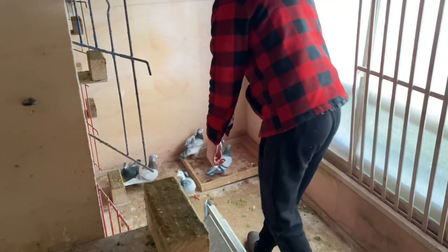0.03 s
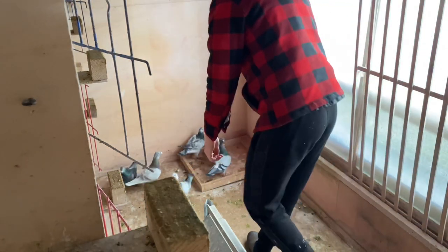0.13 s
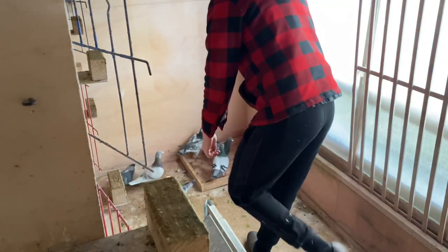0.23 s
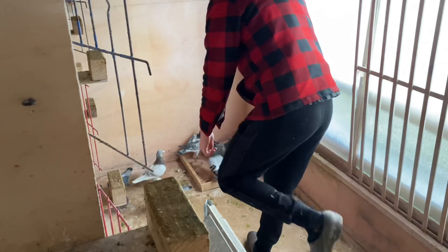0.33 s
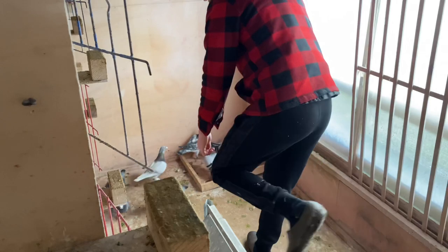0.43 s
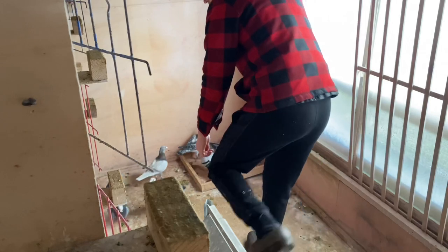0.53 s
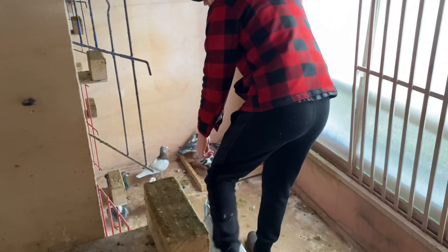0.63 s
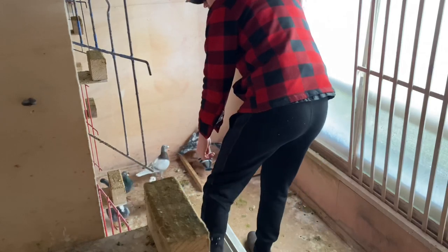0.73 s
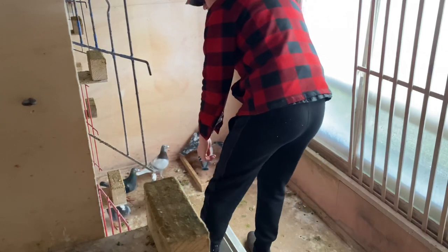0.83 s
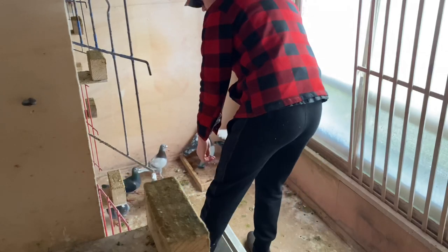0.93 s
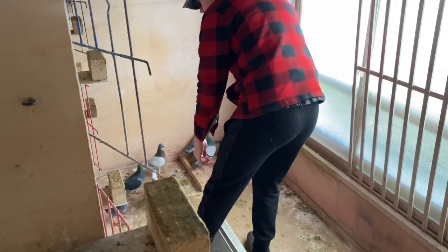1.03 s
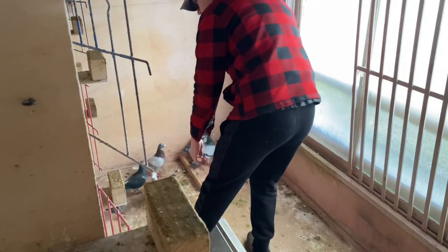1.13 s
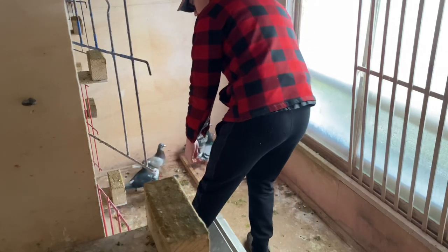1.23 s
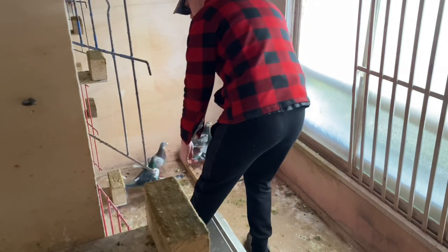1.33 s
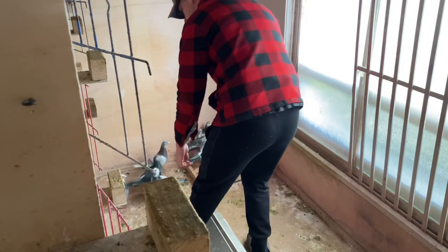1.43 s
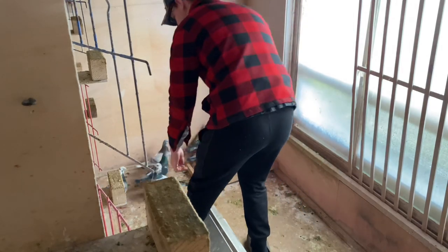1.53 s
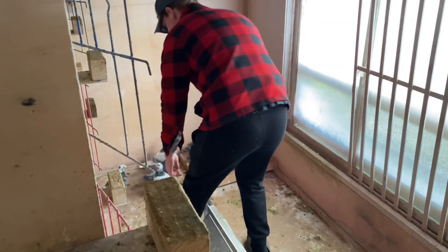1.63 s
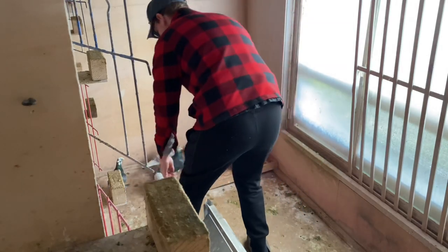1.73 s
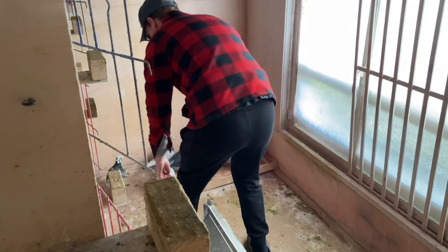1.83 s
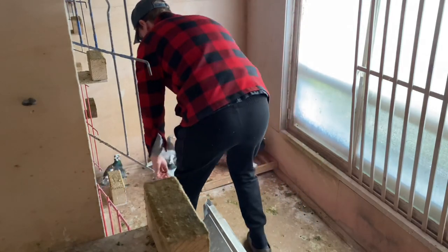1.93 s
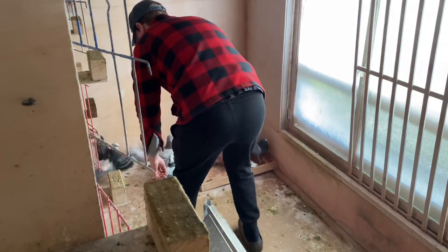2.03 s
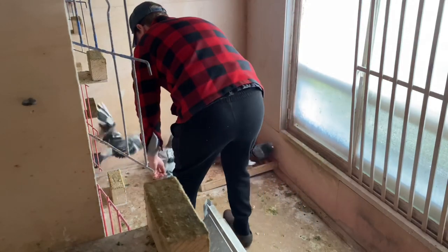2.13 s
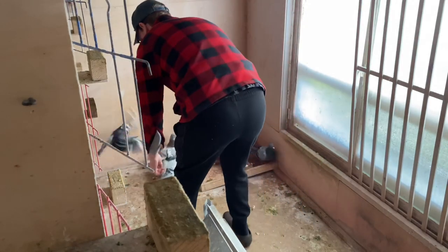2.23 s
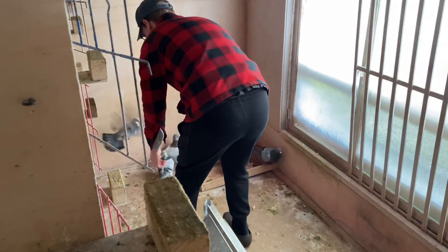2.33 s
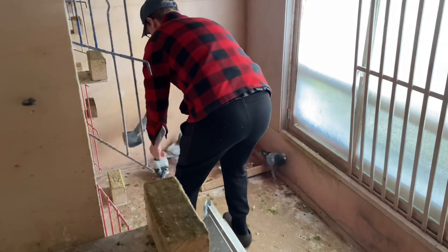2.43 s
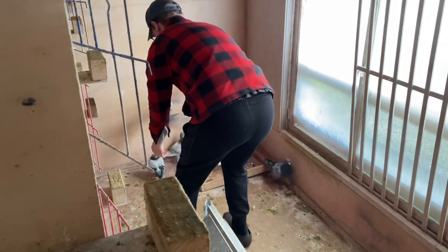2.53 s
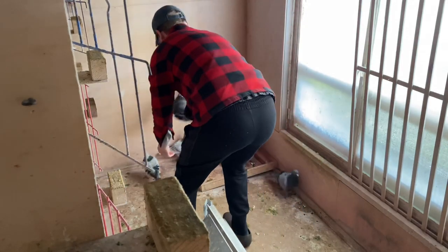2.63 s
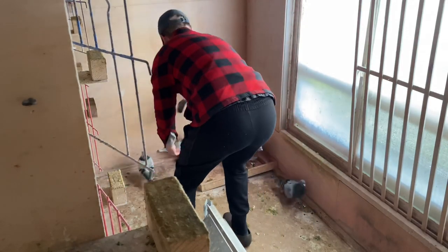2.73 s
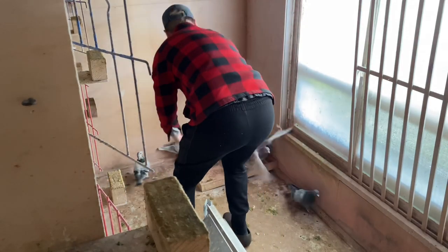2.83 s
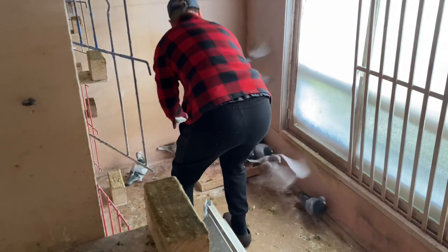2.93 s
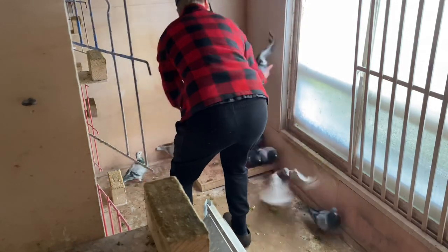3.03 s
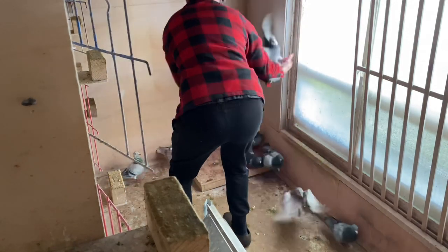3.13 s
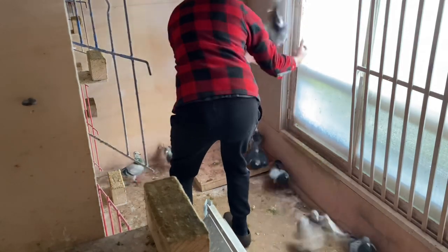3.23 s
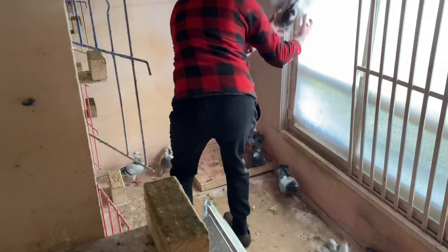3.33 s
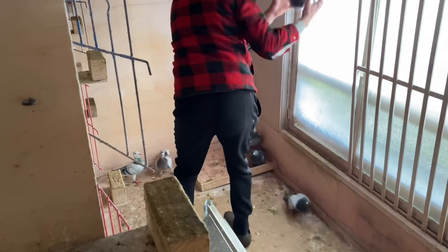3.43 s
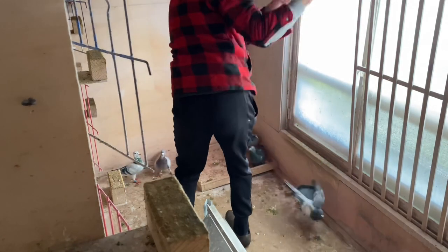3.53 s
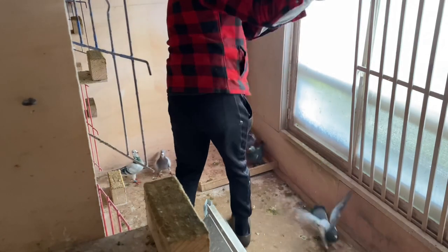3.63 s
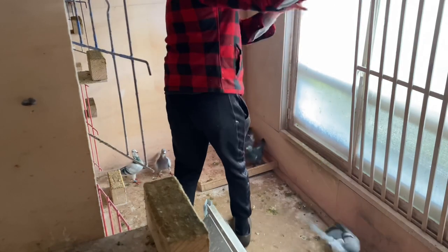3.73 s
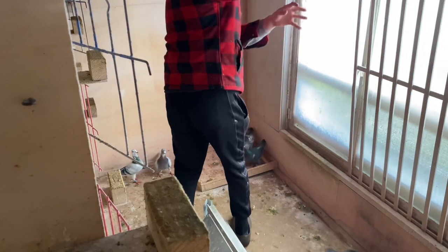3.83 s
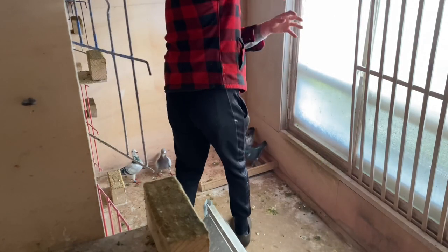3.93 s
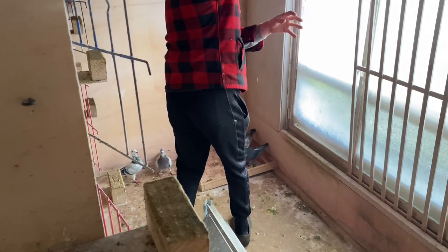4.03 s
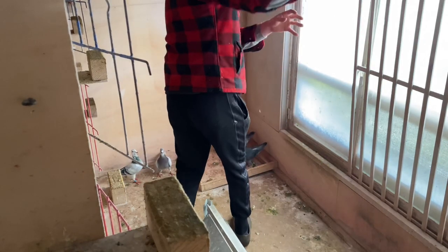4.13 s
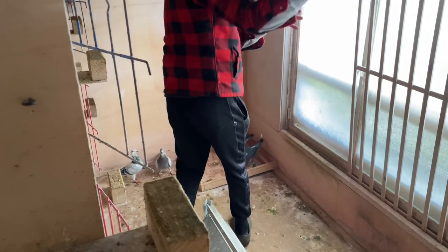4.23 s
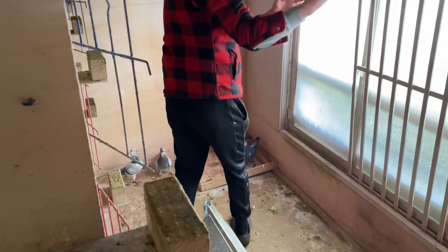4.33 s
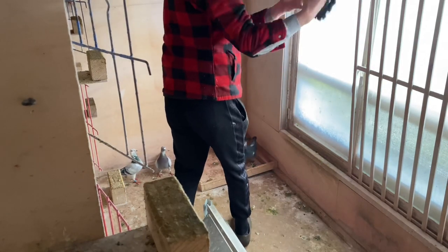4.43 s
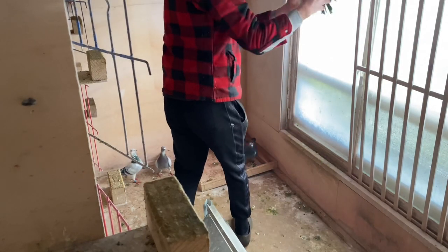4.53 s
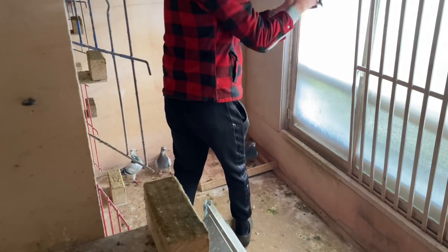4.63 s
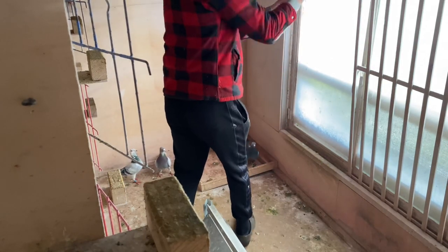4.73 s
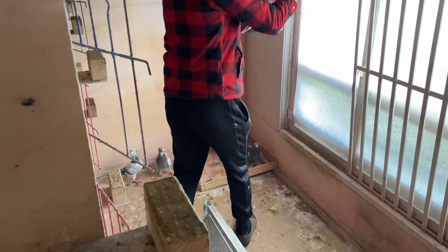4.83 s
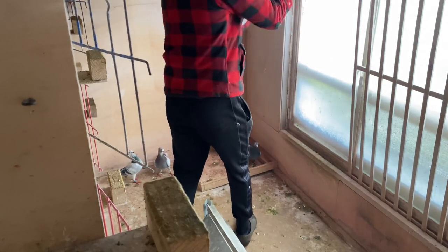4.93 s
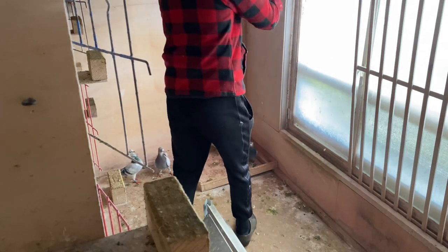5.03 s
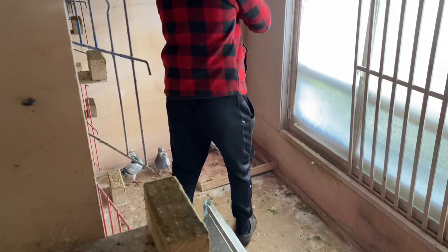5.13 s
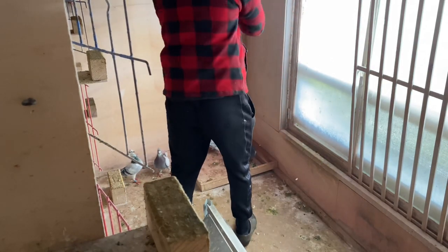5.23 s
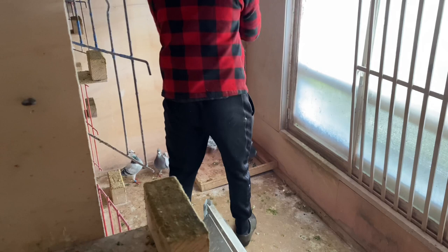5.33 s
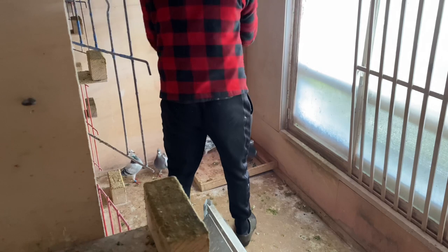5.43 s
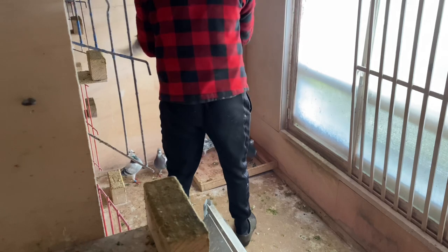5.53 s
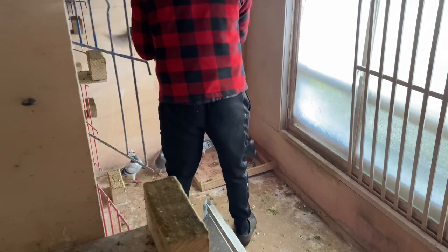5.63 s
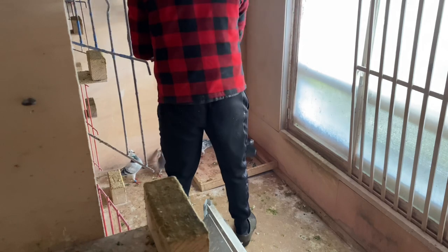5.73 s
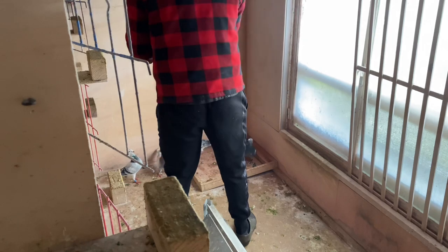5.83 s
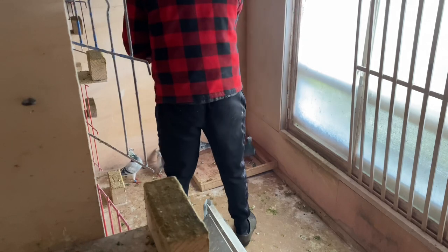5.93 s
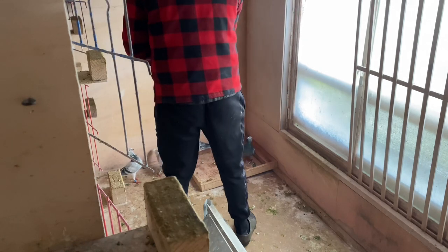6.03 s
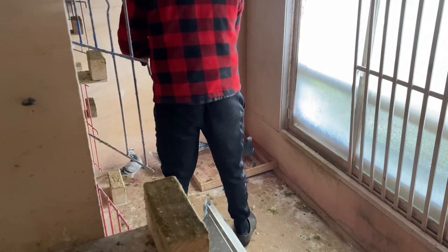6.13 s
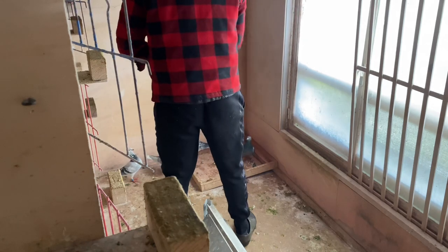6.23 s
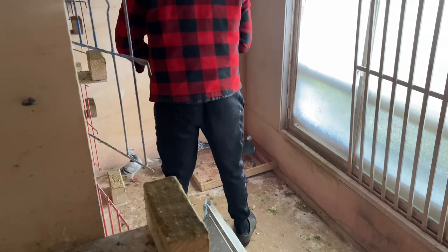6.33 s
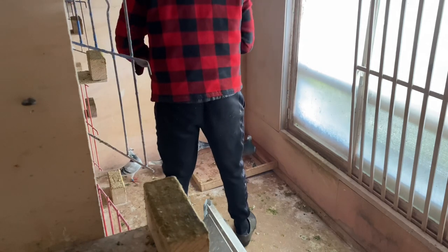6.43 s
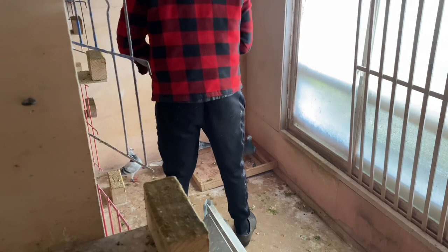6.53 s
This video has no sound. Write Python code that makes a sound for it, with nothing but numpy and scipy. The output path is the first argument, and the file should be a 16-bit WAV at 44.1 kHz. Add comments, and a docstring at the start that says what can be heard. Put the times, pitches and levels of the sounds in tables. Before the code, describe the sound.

A close stereo pickup in a small bare loft, with short, boxy reflections and a faint low hush from outside. From 0 to 2 seconds a keeper's shoes knock, scuff and crackle on gritty boards, busiest around 0.6; at 1.0 a loose plank is struck and rings briefly over a low thud. Around 2.0 wings start, and from 2.2 to 3.7 pigeons flap furiously: quick whooshes, hollow whups, swishing feathers, rattling quills and hard claps, with a sharp tick at 2.5 and deep floor bumps near 2.95 and 3.4. From 3.7 the flurry loosens into separate flaps and claw ticks. Thin, breathy wing whistles pulse at 4.0 to 4.3. Very short, faint coos or grunts come near 4.4 to 4.5 and 5.1. A strong swish lands at 5.3, then more flutters and thumps from 5.5 to 6.2, fading to near quiet with a last shoe knock at 6.5.

```python
"""In a small bare loft, pigeons scatter while a keeper steps in among them to catch one by hand.
Each wing stroke is shaped noise: a push of air, a swish of the vane, rattling quills and a clap of the tips.
Shoes knock and scuff on boards (noise and tiny snaps through resonances), and a loose plank rings once.
Coos, hollow whups and thin wing whistles are wavering sines; filtered noise makes the low boom and a faint hush.
Random echoes, diffuse tails and standing waves make the close walls heard."""
import sys
import numpy as np
from scipy import signal
from scipy.fft import rfft, irfft, next_fast_len
from scipy.io import wavfile
from scipy.ndimage import uniform_filter1d

SR = 44100
rng = np.random.default_rng(int(sys.argv[2]) if len(sys.argv) > 2 else 0)


def write(x):
    x = np.atleast_2d(x).T
    wavfile.write(sys.argv[1], SR, np.round(np.clip(x, -1, 1) * 32767).astype(np.int16))


N = 289737  # samples, about 6.6 s


def from_db(db):
    """Decibels to gain."""
    return 10 ** (np.asarray(db) / 20)


def rms_one(x):
    """Scale to unit rms."""
    return x / np.sqrt(np.mean(x ** 2) + 1e-20)


def at_hz(points, hz):
    """Read a table on a log-frequency axis."""
    known_hz, values = np.transpose(points)
    return np.interp(np.log(np.maximum(hz, 1)), np.log(known_hz), values)


def over_time(points):
    """Draw straight lines between (start_s, level_db) points, one value a sample."""
    return np.interp(np.arange(N) / SR, *np.transpose(points))


def colour(x, spectrum):
    """Filter by a smooth spectrum; white noise keeps its power, so only the shape of the spectrum counts."""
    size = next_fast_len(N + SR // 10)
    gain = rms_one(from_db(at_hz(spectrum, np.fft.rfftfreq(size, 1 / SR))))
    return irfft(rfft(x, size) * gain, size)[..., :N]


def resonate(x, modes):
    """Parallel resonances of alternating sign, scaled so that white noise roughly keeps its power."""
    out, power = 0, 0
    for k, (hz, width_hz, db) in enumerate(modes):
        r = np.exp(-np.pi * width_hz / SR)  # a wide resonance dies sooner
        half_power = (1 - r * r) / 2
        poles = [1, -2 * r * np.cos(2 * np.pi * hz / SR), r * r]
        ringing = signal.lfilter([1, 0, -1], poles, x + 1e-18)
        out = out + (-1) ** k * from_db(db) * half_power * ringing
        power += from_db(db) ** 2 * half_power
    return out / np.sqrt(power)


def cut(x, edge_hz, kind):
    """Second-order high- or low-pass."""
    return signal.sosfilt(signal.butter(2, edge_hz, kind, fs=SR, output="sos"), x)


def bursts(times, levels_db, rise, fade):
    """Sum of envelopes that swell for `rise` seconds to their level and then die away."""
    out, age = np.zeros(N), np.arange(SR // 2) / SR
    for s, db, rise_s, fade_s in np.broadcast(times, levels_db, rise, fade):
        start = max(int(s * SR), 0)
        swell = np.sin(np.pi / 2 * np.minimum(age / rise_s, 1)) ** 2
        decay = np.exp(-np.maximum(age - rise_s, 0) / max(fade_s, 1e-3))
        out[start:start + len(age)] += from_db(db) * (swell * decay)[:N - start]
    return out


def noise():
    """White turbulence."""
    return rng.standard_normal(N)


def grains(per_s, spread_db):
    """Random tiny snaps of uneven size, rms 1."""
    sizes = from_db(spread_db * np.minimum(rng.exponential(1, N), 4))
    happens = rng.random(N) < per_s / SR
    return rms_one(happens * sizes * rng.choice([-1, 1], N))


def ring_in_turn(pair, times, pitches_hz, q):
    """From each event to the next, the sound rings at that event's own pitch."""
    spare = SR // 10  # room for the last part to ring on into the next
    out = np.zeros((2, N + spare))
    edges = np.append(np.maximum(times * SR, 0).astype(int), N)
    for start, stop, hz in zip(edges, edges[1:], pitches_hz):
        part = np.pad(pair[:, start:stop], ((0, 0), (0, spare)))
        out[:, start:start + part.shape[1]] += resonate(part, [(hz, hz / max(q, 1), 0)])
    return out[:, :N]


def reflections(pair, count):
    """Echoes off the nearest walls colour the sound; their delays are redrawn nine times a second."""
    now, strength = np.arange(N), 0.33
    place = now // (SR // 9)
    out = pair.copy()
    for channel in range(2):
        # echo delays between 1/2000 and 1/110 s
        for lags in rng.integers(SR // 2000, SR // 110, (count, place[-1] + 1)):
            out[channel] += strength * pair[channel, np.maximum(now - lags[place], 0)]
    return out / np.sqrt(1 + count * strength ** 2)


def loft(x, t60, direct_db):
    """Close bare walls turn a broadband sound into a diffuse tail (t60 in seconds), different in each channel."""
    keep = from_db(-120 / (max(t60, 0.02) * SR))
    lingering_power = signal.lfilter([1 - keep], [1, -keep], x ** 2 + 1e-18)
    tail = np.sqrt(lingering_power) * rng.standard_normal((2, N))
    # floor and body scatter the direct sound within two milliseconds
    recent_power = np.abs(uniform_filter1d(x ** 2, size=89, origin=44))
    scattered = np.sqrt(recent_power) * rng.standard_normal((2, N))
    near = from_db(direct_db) * (0.38 * x + 0.6 * scattered)
    return reflections(near + tail, count=4) / np.sqrt(1 + from_db(direct_db) ** 2)


# tone of the hush from outside: pitch_hz [Hz], level_db [dB]
OUTSIDE_TONE = [(30, -3), (100, -2.5), (220, -17.5), (600, -25.5), (2000, -37.5), (7000, -46.5),
                (11000, -51), (16000, -63)]


def outside():
    """A faint, mostly low hush from outside: steady noise, drawn separately for each channel."""
    return from_db(-44) * colour(rng.standard_normal((2, N)), OUTSIDE_TONE)


# lowest resonances of the room: pitch_hz [Hz], width_hz [Hz], level_db [dB]
ROOM_MODES = [(48.6, 16.2, -1.5), (75.8, 14.5, 2), (105.5, 18.2, -1), (175, 65, -12.5)]
# how loud the boom is over time: start_s [s], level_db [dB before the boom gain]
BOOM_CURVE = [(0.0, -48), (0.62, -49), (0.9, -77), (1.08, -31), (1.35, -55), (1.96, -42), (2.36, -29),
              (2.87, -30), (3.16, -29.5), (3.57, -27.5), (3.79, -31), (4.3, -36.5), (4.7, -35.5),
              (4.9, -46), (5.25, -40.5), (5.73, -32), (6.33, -41.5), (6.57, -46.5)]
# bumps on the floor: start_s [s], lowest_pitch_hz [Hz], lowest_level_db [dB before the blow's trim],
# upper_level_db [dB before the same trim]
THUDS = [(0.343, 62, -27, -26), (1.022, 52.8, -13.5, -23), (1.445, 59, -18, -17.5), (1.64, 59, -25, -32),
         (1.986, 54.6, -23, -28), (2.948, 56, -12.5, -13.5), (3.147, 60.3, -29, -13.5),
         (3.376, 57.5, -6.5, -21), (3.662, 55.3, -14, -21), (4.1, 72, -26, -48), (4.416, 70, -22, -27),
         (4.61, 70, -19, -25), (5.514, 56, -22, -15), (5.591, 61, -19, -25), (5.794, 54.5, -14.5, -11.5),
         (6.025, 63, -16.5, -13)]
# upper resonances of the floor: pitch_hz [Hz], width_hz [Hz], level_db [dB]
FLOOR_MODES = [(105.1, 6.9, 22), (186, 8.4, 7.2)]
FLOOR_WIDTH_HZ = 5.8  # of the lowest mode, whose pitch depends on where the floor is struck
BOOM_GAIN_DB, BLOW_TRIM_DB = 3, -19.0


def boom():
    """Wing draughts stir the lowest room modes; bumps ring the floor, each with its own low and upper ring."""
    rumble = cut(resonate(rng.standard_normal((2, N)), ROOM_MODES), 260, "low")
    draught = rms_one(rumble) * from_db(over_time(BOOM_CURVE) + BOOM_GAIN_DB)

    def push(times, levels_db):
        """A padded blow of a few milliseconds."""
        return bursts(times, np.asarray(levels_db) + BLOW_TRIM_DB, rise=0.0033, fade=0.0022)

    lowest = sum(resonate(push([s], [db]), [(hz, FLOOR_WIDTH_HZ, 0)]) for s, hz, db, _ in THUDS)
    times, *_, upper_db = np.transpose(THUDS)
    return draught + lowest - resonate(push(times, upper_db), FLOOR_MODES)


# one knock on a loose plank: start_s [s], level_db [dB]
PLANK_KNOCK = (1.012, -15.5)
# notes of the plank: pitch_hz [Hz], level_db [dB], t60_s [s to fall by 60 dB]
PLANK_MODES = [(286.6, -16, 0.31), (438, -16, 0.21), (524, -6.5, 0.27), (584, -1.5, 0.11),
               (770, -16.5, 0.19), (1017, -19, 0.17), (1180, -6.5, 0.066)]
# tone of a sharp crack or clap, also used by the wings: pitch_hz [Hz], level_db [dB]
CLAP_TONE = [(200, -3), (600, 5.5), (1500, 7), (4000, -2.5), (8000, -5.5), (11000, -3), (16000, -11)]
WALL_TO_WALL_S, PLANK_CONTACT_S = 0.021, 0.0057


def plank():
    """The struck plank cracks and rings briefly, and the blow bounces back and forth between the walls."""
    age = np.arange(SR // 2) / SR
    ring = sum(from_db(db - 60 * age / t60) * np.sin(2 * np.pi * hz * age) for hz, db, t60 in PLANK_MODES)
    ring = ring * np.minimum(age / PLANK_CONTACT_S, 1)
    out, (s, db) = np.zeros(N), PLANK_KNOCK
    for trip in range(3):  # each trip is 9 dB weaker
        start = int((s + trip * WALL_TO_WALL_S) * SR)
        out[start:start + len(age)] += from_db(db - 9.0 * trip) * ring
    crack = noise() * bursts([s - 0.003], [db - 18], rise=0.0015, fade=0.0032)
    return out + colour(loft(crack, t60=0.24, direct_db=11.0), CLAP_TONE)


# grit and husks breaking underfoot: start_s [s], level_db [dB before a trim]
CRACKS = [(0.233, -43), (0.314, -43), (0.398, -36), (0.499, -35), (0.643, -28.5), (0.722, -49),
          (0.849, -34), (0.907, -42), (0.977, -42), (1.009, -27), (1.096, -37), (1.164, -38.5),
          (1.252, -35), (1.361, -42), (1.415, -27.5), (1.453, -40), (1.481, -32), (1.514, -29.5),
          (1.555, -45), (1.734, -37), (1.807, -37), (1.89, -36), (1.955, -34), (1.991, -30), (2.106, -24),
          (4.13, -34), (4.234, -51), (6.364, -44)]
# tone of a breaking grain: pitch_hz [Hz], level_db [dB]
CRACK_TONE = [(600, 6), (1500, 7), (2500, 5), (4500, 6), (8000, -9), (11500, -8.5), (16000, -28)]


def cracks():
    """Single grains of grit and dry husks break underfoot, each in a quick run of splinters."""
    s, db = np.transpose(CRACKS)
    splinters = grains(per_s=2900, spread_db=4.0) * bursts(s, db - 2.5, rise=0.00052, fade=0.0024)
    return colour(loft(splinters, t60=0.14, direct_db=0.0), CRACK_TONE)


# shoes on gritty boards: start_s [s], knock_db [dB before a trim], scuff_db [dB], fade_s [s, shortened for
# the knock], slat_pitch_hz [Hz], slat_db [dB before a trim]
STEPS = [(0.002, -29.5, -38.5, 0.0069, 780, -48), (0.143, -36.5, -37.5, 0.027, 1600, -37),
         (0.21, -50, -57, .006, 1280, -50), (0.295, -43, -43, 0.017, 1860, -44),
         (0.332, -27.5, -44, 0.0035, 1180, -41), (0.4, -30.5, -36, 0.031, 1200, -31.5),
         (0.478, -41, -44, 0.043, 1200, -55), (0.524, -28, -58, 0.0056, 1200, -41.5),
         (0.593, -20, -41, 0.0044, 1590, -29.5), (0.612, -21.5, -60, 0.0048, 1210, -39),
         (0.639, -24, -29.5, 0.0043, 1150, -36.5), (0.697, -45, -61, 0.0063, 750, -54),
         (0.721, -40, -52, 0.0053, 1200, -47), (0.815, -44.5, -44, 0.035, 1230, -58),
         (0.908, -61, -44.5, 0.021, 2000, -58), (0.946, -38.5, -42.5, 0.052, 745, -47),
         (1.006, -19, -33, 0.025, 1190, -41), (1.127, -34, -50, .008, 850, -42),
         (1.194, -34.5, -30, 0.0086, 740, -41), (1.254, -40, -53, 0.005, 1200, -49),
         (1.362, -33, -39, 0.02, 1060, -34.5), (1.411, -35.5, -39, 0.019, 1180, -47),
         (1.48, -36, -40, 0.0088, 1500, -52), (1.515, -45, -38, 0.012, 1200, -61),
         (1.554, -50, -37, 0.0062, 2800, -41), (1.626, -38, -34, 0.0038, 680, -34.5),
         (1.638, -26.5, -31, 0.013, 1551, -32), (1.685, -32, -53, 0.0048, 1200, -46),
         (1.716, -45, -54, 0.015, 1200, -59), (1.748, -34.5, -44, 0.0069, 1300, -50),
         (1.787, -41, -41, 0.014, 780, -36.5), (1.894, -27.5, -38, 0.0058, 1190, -36.5),
         (1.963, -45, -40, 0.014, 730, -39), (6.515, -31, -42.5, 0.002, 1210, -64)]
# resonances of the boards: pitch_hz [Hz], width_hz [Hz], level_db [dB]
BOARD_MODES = [(179, 26, 2), (307, 43, 6.5), (447, 63, 1), (546, 41, 4.5), (620, 60, 2.5), (736, 99, -1),
               (1150, 290, -6.5)]
# tone of a sliding sole: pitch_hz [Hz], level_db [dB]
SCUFF_TONE = [(160, 20), (300, -37), (700, 8.5), (1200, -0.5), (1900, 0.5), (3000, -2), (8000, -34)]
# tone of crushed grit: pitch_hz [Hz], level_db [dB]
GRIT_TONE = [(900, -4), (2500, -4), (4500, 12), (8000, 1.5), (11500, 4), (16000, -49)]
SLAT_Q = 3.7  # sharpness of the ring of a slat
HARD_SCUFF_DB = -32
GRIT_DB, GRIT_FOLLOWS = -41, 0.78  # grit under a hard scuff, and the share of the scuff's swing it follows


def steps():
    """A shoe knocks the boards, scuffs along them so that a slat chatters, and crushes grit."""
    s, knock_db, scuff_db, fade, slat_hz, slat_db = np.transpose(STEPS)
    grit_db = GRIT_DB + GRIT_FOLLOWS * (scuff_db - HARD_SCUFF_DB)
    blow = noise() * bursts(s, knock_db + 2.0, rise=0.00075, fade=fade * 0.82)
    # the sole catches on the boards again and again
    slide = grains(per_s=800, spread_db=4.0) * bursts(s, scuff_db, rise=0.013, fade=fade)
    chatter = grains(per_s=450, spread_db=2.0) * bursts(s, slat_db + 2.5, rise=0.00094, fade=0.014)
    crunch = grains(per_s=2900, spread_db=4.0) * bursts(s, grit_db, rise=0.00062, fade=fade)
    knock = cut(resonate(loft(blow, t60=0.38, direct_db=-2.5), BOARD_MODES), 104, "high")
    scuff = colour(loft(slide, t60=0.36, direct_db=0.5), SCUFF_TONE)
    slats = ring_in_turn(loft(chatter, t60=0.13, direct_db=6.0), s, slat_hz, SLAT_Q)
    grit = colour(loft(crunch, t60=0.24, direct_db=4.0), GRIT_TONE)
    return knock + scuff + cut(slats, 2100, "low") + grit


# coos and grunts: start_s [s], length_s [s], first_pitch_hz [Hz], last_pitch_hz [Hz], level_db [dB before
# a trim], hoarseness [strength of the overtones]
COOS = [(4.394, 0.04, 356, 334, -33, 0), (4.495, 0.025, 379, 343, -19.5, 0.24),
        (4.52, 0.016, 344, 330, -28, 0.03), (5.069, 0.041, 341, 340, -33, 0.16),
        (5.125, 0.072, 313, 352, -46.5, 1.1), (5.188, 0.067, 373, 411, -50.5, 1.3)]
COO_T60_S = 0.14


def coos():
    """A closed-beak hum: a wavering near-sine, with a fifth and an octave when hoarse, ringing on in the walls."""
    out, waver = np.zeros(N), rms_one(cut(noise(), 92, "low"))
    for s, length, first_hz, last_hz, db, hoarse in COOS:
        span = slice(int(s * SR), int(s * SR) + int(length * SR))
        progress = np.linspace(0, 1, span.stop - span.start)
        pitch_hz = (first_hz + (last_hz - first_hz) * progress) * (1 + 0.079 * waver[span])
        phase = 2 * np.pi * np.cumsum(pitch_hz) / SR
        overtones = np.sin(3 * phase / 2) + from_db(-3.0) * np.sin(2 * phase)
        voice = np.sin(phase) + hoarse * overtones
        out[span] += from_db(db - 2.0) * np.sin(np.pi * progress) * voice
    walls = rng.standard_normal((2, SR // 2)) * from_db(-60 * np.arange(SR // 2) / SR / COO_T60_S)
    walls /= np.linalg.norm(walls, axis=1, keepdims=True)
    return out + from_db(2.0) * signal.fftconvolve(out[None], walls, axes=1)[:, :N]


# feather rustle over time: start_s [s], level_db [dB before the rustle gain]
RUSTLE_CURVE = [(0.0, -61.5), (0.6, -77), (0.78, -74), (1.1, -64), (1.33, -74), (1.7, -65), (1.87, -66),
                (1.99, -51.5), (2.19, -42.5), (2.29, -40), (2.43, -43.5), (2.67, -53), (2.89, -40),
                (3.02, -41), (3.88, -41), (4.04, -79), (4.35, -49.5), (4.61, -48), (4.86, -55), (4.93, -47),
                (5.0, -61.5), (5.22, -51), (5.65, -51.5), (5.95, -48.5), (6.15, -50), (6.39, -58.5),
                (6.57, -99)]
# stirred air over time: start_s [s], level_db [dB before the air gain]
AIR_CURVE = [(0.0, -66), (0.45, -49), (0.78, -58), (1.34, -62), (1.47, -39.5), (1.6, -59), (1.86, -49),
             (1.96, -40.5), (2.45, -31), (2.79, -35), (2.95, -25), (3.1, -32), (3.37, -23.5), (3.79, -33.5),
             (4.26, -38), (4.61, -33), (4.79, -53), (4.98, -44), (5.23, -40), (5.4, -37.5), (5.74, -33),
             (6.02, -35), (6.37, -45.5), (6.57, -67)]
# tone of brushing feathers: pitch_hz [Hz], level_db [dB]
RUSTLE_TONE = [(250, 8), (700, 11.5), (1300, 9), (2500, -2.5), (4500, -0.5), (8300, -4.5), (11000, 3),
               (13000, -1.5), (16000, -15)]
# resonances of moving air, also used by the wings: pitch_hz [Hz], width_hz [Hz], level_db [dB]
AIR_MODES = [(301, 36.6, 1), (399, 49.6, -1.5), (590, 106, -4.5), (780, 72, -6.5), (980, 427, -14)]
RUSTLE_GAIN_DB, AIR_GAIN_DB = 6, 1


def flock():
    """Smaller movements between strokes: feathers brush each other in clumps and keep the air stirred."""
    rustle_level = from_db(over_time(RUSTLE_CURVE) + RUSTLE_GAIN_DB)
    air_level = from_db(over_time(AIR_CURVE) + AIR_GAIN_DB)
    unrest = np.tanh(rms_one(cut(noise(), 37.6, "low")))
    brushing = grains(per_s=3700, spread_db=9.0) * rms_one(from_db(11.6 * unrest)) * rustle_level
    stirring = noise() * rms_one(from_db(2.8 * unrest)) * air_level
    rustle = colour(loft(brushing, t60=0.23, direct_db=-3.0), RUSTLE_TONE)
    air = resonate(loft(stirring, t60=0.07, direct_db=5.5), AIR_MODES)
    return rustle + cut(air, 203, "high")


# claws and quill tips against boards and window bars: start_s [s], level_db [dB before a trim]
TICKS = [(0.229, -41), (0.402, -37), (0.594, -36), (0.643, -46), (1.361, -32), (1.481, -42), (2.519, -4),
         (2.915, -25), (3.6386, -12.5), (3.7544, -12), (3.867, -7.5), (3.9544, -6.5), (4.3445, -36),
         (4.7036, -10), (5.0235, -26.5), (5.466, -15), (5.574, -16.5), (5.7882, -22), (6.173, -13.5)]
# tone of a tick: pitch_hz [Hz], level_db [dB]
TICK_TONE = [(1200, -12), (3000, -0.5), (7000, -1), (11000, 8.5), (16000, -5.5)]


def ticks():
    """Hard, tiny contacts of claws and quill tips: mostly treble and very short."""
    s, db = np.transpose(TICKS)
    contacts = noise() * bursts(s, db - 7.0, rise=0.0004, fade=0.0012)
    return colour(loft(contacts, t60=0.28, direct_db=4.5), TICK_TONE)


# notes of the outer wing feathers: pitch_hz [Hz], level_db [dB]
PRIMARIES = [(3550, -7), (4440, 0.5)]
TAKEOFF_S, WINGBEAT_S = 4.002, 0.069
WHISTLE_DB, WHISTLE_LOSS_DB = -48.5, 2.0  # level in the middle, and loss a wingbeat either side of it


def whistles(count):
    """A bird flying past gives one short, thin, breathy note a wingbeat, loudest in the middle of its flight."""
    beat = np.arange(count)
    clock = np.cumsum(1 + 0.045 * rms_one(cut(noise(), 500, "low"))) / SR  # unsteady time makes it breathy
    levels_db = WHISTLE_DB - WHISTLE_LOSS_DB * np.abs(beat - beat.mean())
    notes = bursts(TAKEOFF_S + WINGBEAT_S * beat, levels_db, rise=0.007, fade=0.013)
    return notes * sum(from_db(db) * np.sin(2 * np.pi * hz * clock) for hz, db in PRIMARIES)


# the hollow note of a full stroke: start_s [s], pitch_hz [Hz, before it wavers], level_db [dB before a trim]
WHUPS = [(0.522, 325, -32.5), (0.692, 325, -37), (2.207, 315, -31), (2.261, 304.3, -23), (2.31, 345, -25),
         (2.403, 295, -20.5), (2.413, 395.7, -23.5), (2.455, 343.5, -29.5), (2.482, 314, -25.5),
         (2.606, 345, -21.5), (2.629, 305, -39), (2.707, 328.6, -23), (2.925, 333.4, -25.5),
         (3.117, 313.5, -31.5), (3.346, 350, -24), (3.478, 344, -23), (5.703, 335, -30.5), (5.79, 310, -33),
         (6.041, 300, -30)]


def whups():
    """Vortices leave the wing's edge for a few unsteady cycles: a hollow, rounded thump."""
    out, unsteady = 0, 1 + 0.16 * rms_one(cut(noise(), 107.9, "low"))
    clock = np.cumsum(unsteady) / SR
    for s, hz, db in WHUPS:
        out = out + bursts([s], [db + 2.5], rise=0.017, fade=0.022) * np.sin(2 * np.pi * hz * clock)
    return cut(out, 220, "high")


# wing strokes, for the next two functions: start_s [s], air_db [dB], feather_db [dB before each part's
# offset], hardness [0 = free swish, 1 = clap of the tips], fade_s [s], ring_pitch_hz [Hz], ring_db [dB
# before a trim]
STROKES = [(1.993, -34, -45, 0.13, 0.039, 1100, -57), (2.04, -32, -53, 0.27, .02, 765, -35.5),
           (2.1318, -56, -32, 0.57, 0.04, 1200, -46), (2.212, -24.5, -21.5, 0.44, 0.016, 1830, -28),
           (2.274, -20, -35, 0.89, 0.014, 670, -18), (2.322, -24, -30, 0.72, 0.014, 620, -23),
           (2.418, -21, -39, 0.99, 0.018, 1244, -41), (2.466, -18.5, -38, 0.38, 0.011, 750, -28),
           (2.516, -21, -19, 0.47, 0.025, 1220, -19), (2.592, -21, -42, .1, .01, 580, -26),
           (2.615, -24.5, -22, 0.46, 0.0087, 870, -38), (2.674, -25, -35, 0.19, .012, 1850, -26),
           (2.71, -21.5, -23, 0.2, 0.011, 595, -41), (2.804, -26, -29, 0.18, 0.014, 1210, -31),
           (2.843, -24, -20, 0.053, 0.022, 827, -29), (2.86, -31, -34, .1, .01, 1410, -40),
           (2.913, -27, -20.5, 0.71, 0.012, 3100, -24.5), (2.9465, -15, -20.5, 0.51, 0.0093, 2790, -31),
           (2.981, -47, -30, .1, .008, 990, -24), (3.006, -38, -16.5, 0.24, 0.018, 870, -25.5),
           (3.047, -15, -26.5, 0.67, 0.0065, 824, -31), (3.128, -31, -19, 0.14, 0.018, 1015, -20.5),
           (3.179, -19, -26.5, 0.48, 0.028, 2760, -31.5), (3.22, -20, -31, 0.43, 0.0066, 645, -26),
           (3.317, -21.5, -25.5, 0.21, 0.028, 1090, -32), (3.357, -36, -31, .45, .007, 910, -32),
           (3.376, -23, -24, 0.2, 0.049, 890, -25.5), (3.421, -39, -29, .1, .0095, 2070, -27),
           (3.4482, -20, -20.5, 0.4, 0.026, 2820, -28.5), (3.49, -23, -31, .11, .0085, 780, -28),
           (3.636, -23, -26.5, 0.22, 0.06, 2160, -37), (3.679, -26.5, -34.5, 0.66, 0.01, 2260, -32.5),
           (3.786, -56, -32, 0.79, 0.015, 734, -28), (3.87, -31, -30.5, 0.43, 0.054, 770, -30),
           (3.9537, -32, -35, 0.66, 0.023, 1230, -34), (4.017, -30, -33, .05, 0.0086, 1120, -36),
           (4.1314, -41, -35, 0.054, 0.0091, 780, -37), (4.345, -29.5, -33.5, 0.35, 0.0046, 990, -43),
           (4.431, -26, -29, 0.23, 0.063, 776, -43), (4.614, -27, -42.5, 0.73, 0.074, 998, -48),
           (4.645, -25, -28, 0.54, 0.015, 1200, -48), (4.661, -42, -36, .1, 0.0072, 870, -22),
           (4.709, -33, -32, 0.45, 0.04, 2020, -37), (4.7762, -37, -37, 0.53, 0.014, 1110, -36),
           (4.932, -46, -43, 0.05, 0.01, 610, -40), (5.145, -37, -43, 0.093, 0.04, 504, -34.5),
           (5.204, -39, -47, .05, 0.037, 870, -33.5), (5.273, -26, -14.5, 0.36, 0.015, 1260, -30),
           (5.43, -37, -42, 0.27, 0.01, 1280, -38), (5.468, -36, -37.5, 0.59, 0.013, 1500, -35),
           (5.5023, -24, -33, 0.24, 0.024, 820, -49), (5.569, -44, -31, 0.28, 0.039, 1000, -35),
           (5.71, -27.5, -48, 0.99, 0.012, 570, -28), (5.753, -31, -49, .1, .015, 545, -32),
           (5.786, -21.5, -28, 0.44, 0.0098, 1300, -36), (5.842, -42, -31, 0.35, 0.014, 970, -30),
           (5.953, -19, -22.5, 0.23, 0.021, 2430, -27), (6.015, -48, -25.5, 0.26, 0.0086, 1090, -27.5),
           (6.057, -26.5, -43, 0.36, 0.022, 930, -29), (6.1707, -22, -36, 0.62, 0.023, 2070, -34.5)]
POCKET_Q = 10.8  # sharpness of the ring of a cupped wing


def pockets():
    """The air cupped under the wing rings briefly as the feathers slap down one after another."""
    s, *_, pitch_hz, ring_db = np.transpose(STROKES)
    slaps = grains(per_s=450, spread_db=1.5) * bursts(s, ring_db + 1.5, rise=0.0036, fade=0.011)
    return ring_in_turn(loft(slaps, t60=0.24, direct_db=6.5), s, pitch_hz, POCKET_Q)


# tone of rattling quills: pitch_hz [Hz], level_db [dB]
QUILL_TONE = [(900, -8), (2000, -0.5), (3000, -9), (5000, 4.5), (8300, -2), (11000, 3.5), (13000, 1.5),
              (16000, -62)]
# tone of the swishing vane: pitch_hz [Hz], level_db [dB]
VANE_TONE = [(300, 11), (650, 11), (900, 4.5), (1300, 6), (2300, 2), (3500, -4.5), (8000, -15)]
# each part of a stroke: (dB relative to the feather level when free, the same when clapped)
SWISH_DB, QUILL_DB, CLAP_DB = (-0.5, -2), (-14.5, 9.5), (-8.5, 16)
SNAP_DB = -8  # single quills snap past each other, relative to the quill level
FREE_SWELL_S, CLAP_SWELL_S = 0.0071, 0.0046  # the harder a stroke, the more abrupt
AIR_LEAD_S = 0.014  # the air moves before the feathers sound


def wings():
    """The downstroke pushes air first; then the vane swishes, the quills rattle and the tips slap."""
    s, air_db, feather_db, hardness, fade, *_ = np.transpose(STROKES)
    # a stroke that ends in a clap is abrupt and bright, a free one swells and swishes
    swish_db = feather_db + np.interp(hardness, [0, 1], SWISH_DB)
    quill_db = feather_db + np.interp(hardness, [0, 1], QUILL_DB)
    clap_db = feather_db + np.interp(hardness, [0, 1], CLAP_DB)
    swell = np.interp(hardness, [0, 1], [FREE_SWELL_S, CLAP_SWELL_S])
    # feathers slip over each other in fits, which makes the swish coarse
    fits = rms_one(from_db(2.6 * rms_one(cut(noise(), 160, "low"))))
    push = noise() * bursts(s - AIR_LEAD_S, air_db, rise=0.015, fade=0.02)
    brush = noise() * fits * bursts(s - 0.002, swish_db, rise=swell, fade=fade)
    rattle = grains(per_s=5300, spread_db=-9.0) * fits * bursts(s - 0.001, quill_db, rise=swell, fade=fade)
    snaps = grains(per_s=260, spread_db=3.0) * bursts(s, quill_db + SNAP_DB, rise=swell, fade=fade)
    slap = noise() * bursts(s, clap_db, rise=0.0003, fade=0.0034)
    whoosh = cut(resonate(loft(push, t60=0.48, direct_db=-1.5), AIR_MODES), 243, "high")
    swish = colour(loft(brush, t60=0.14, direct_db=-4.0), VANE_TONE)
    quills = colour(loft(rattle, t60=0.2, direct_db=5.5) + snaps, QUILL_TONE)
    clap = colour(loft(slap, t60=0.2, direct_db=2.5), CLAP_TONE)
    return whoosh + swish + quills + clap


# standing waves between the walls lift some notes and swallow others: pitch_hz [Hz], width_hz [Hz],
# level_db [dB]
STANDING_WAVES = [(207, 29, -0.5), (401.8, 14.6, 1.5), (441, 9.1, 4.5), (524, 35, -3.5), (571, 16, 2.5),
                  (642, 31, 3), (669, 52, -6.5), (774, 12, 4.5), (850, 14, 4.5), (1076, 57, -5),
                  (1140, 47, 3), (1296, 135, -3), (1354, 60, 2.5), (1480, 82, -2)]


def standing_waves(pair):
    """Birds and keeper are heard through the same narrow peaks and dips."""
    for hz, width_hz, db in STANDING_WAVES:
        half, gain = np.pi * width_hz / SR, from_db(db / 2)
        middle = -2 * np.cos(2 * np.pi * hz / SR)
        zeros = [1 + half * gain, middle, 1 - half * gain]
        poles = [1 + half / gain, middle, 1 - half / gain]
        pair = signal.lfilter(zeros, poles, pair)
    return pair


# how alike the two channels are: pitch_hz [Hz], likeness [0-1]
LIKENESS = [(105, 1), (130, 0.5), (300, 0.9), (460, 0.1), (6000, 0.05), (8000, 0.65), (9300, 0.85),
            (11000, .97)]
# which channel is louder: pitch_hz [Hz], level_db [dB, left minus right]
BALANCE_DB = [(30, -6), (110, 9), (220, -2.5), (400, 10.5), (800, 3), (1500, 3.5), (4000, 5.5), (8300, 5.5),
              (9300, 0.5), (15000, 0)]
LEFT_LAG = 12  # samples


def two_channels(pair):
    """Two channels; the left is slightly later and louder at most pitches; likeness varies with pitch."""
    size = next_fast_len(N + SR // 10)
    hz, (left, right) = np.fft.rfftfreq(size, 1 / SR), rfft(pair, size)
    alike = np.clip(at_hz(LIKENESS, hz), 0, 1)
    lean = from_db(at_hz(BALANCE_DB, hz) / 2)
    right = alike * left + np.sqrt(1 - alike ** 2) * right
    left = left * np.exp(-2j * np.pi * hz * LEFT_LAG / SR)
    return irfft(np.array([left * lean, right / lean]), size)[:, :N]


def scene():
    """Birds and keeper in the loft, over a low boom and a faint hush from outside."""
    background = boom() + outside()
    keeper = plank() + cracks() + steps()
    birds = coos() + flock() + ticks() + whistles(count=5) + whups() + pockets() + wings()
    return two_channels(from_db(0.83) * standing_waves(birds + keeper) + background)


CUTOFF_HZ = 15900


def record(dry):
    """The deepest rumble and the top are cut."""
    top = signal.ellip(10, 0.1, 80, CUTOFF_HZ, fs=SR, output="sos")
    return signal.sosfilt(top, cut(dry, 33, "high"))


dry = scene()
out = record(dry)
write(out)
```